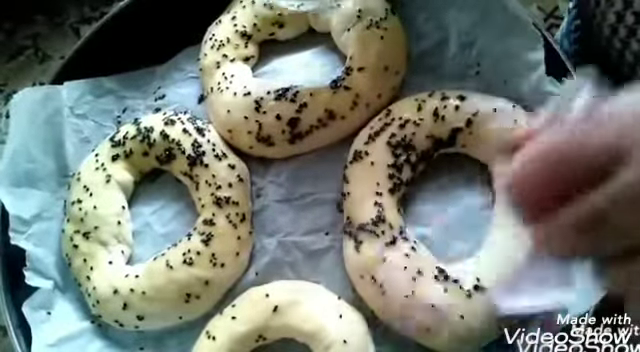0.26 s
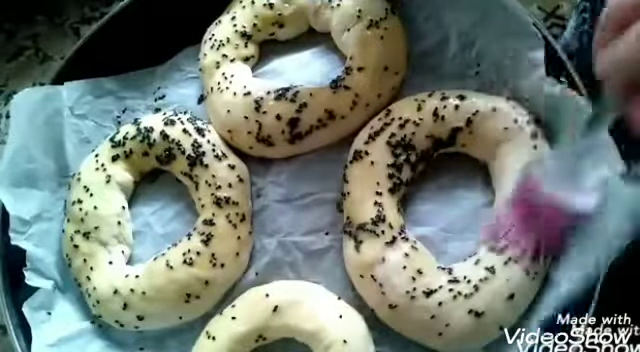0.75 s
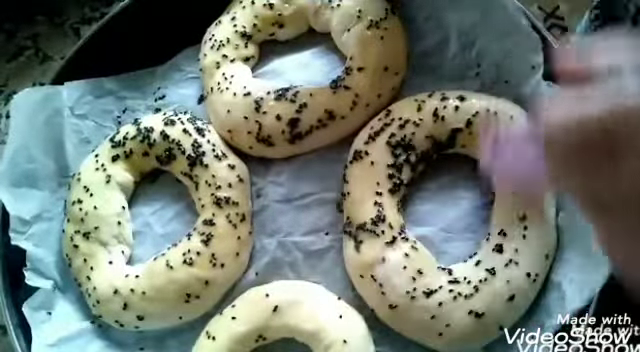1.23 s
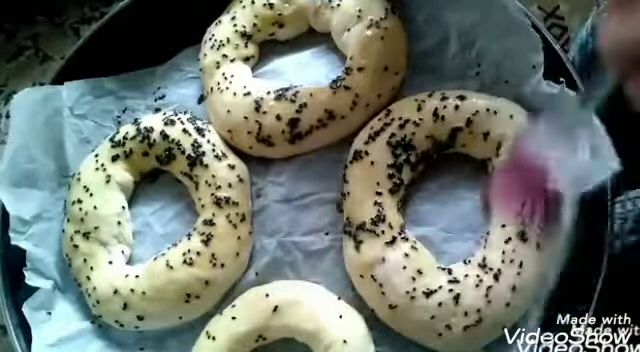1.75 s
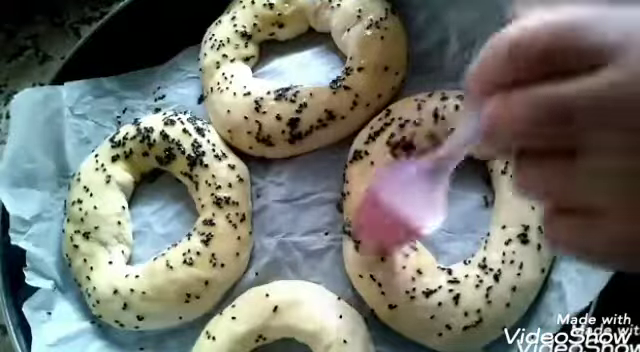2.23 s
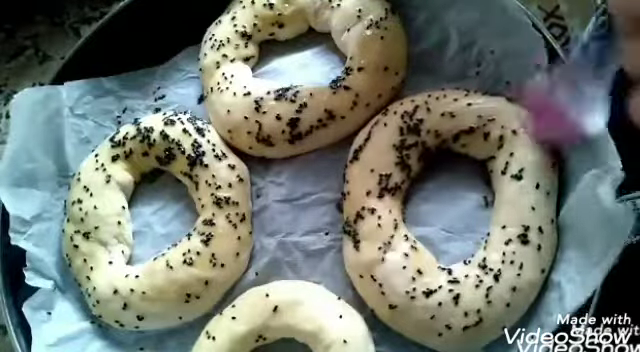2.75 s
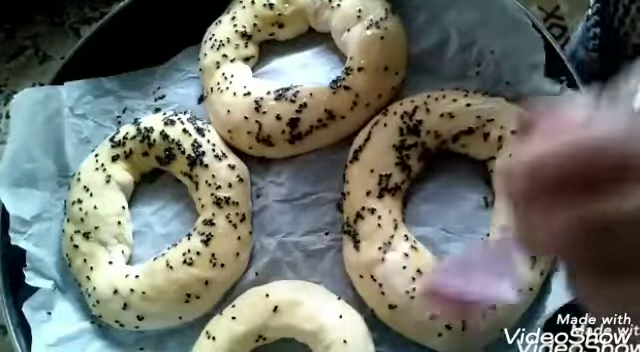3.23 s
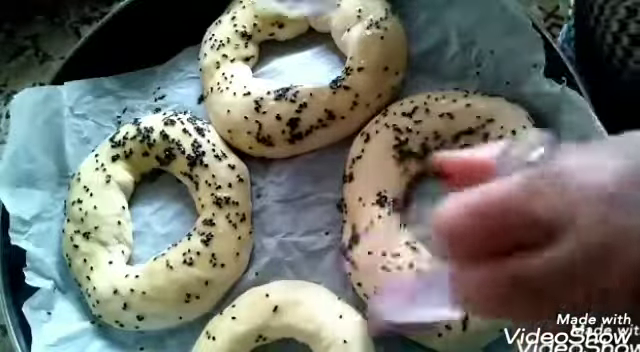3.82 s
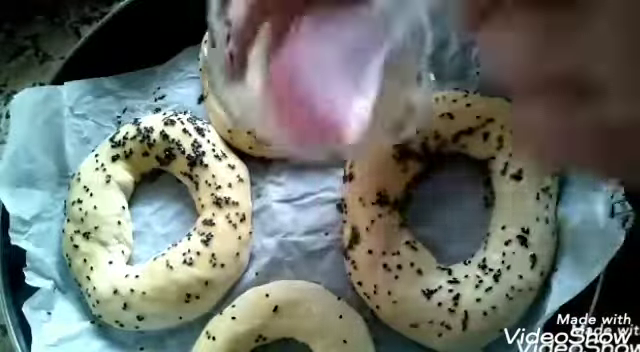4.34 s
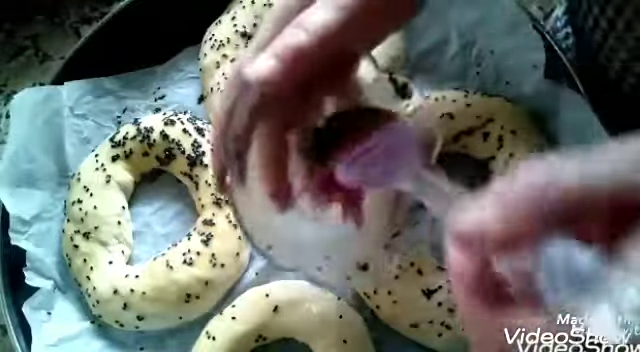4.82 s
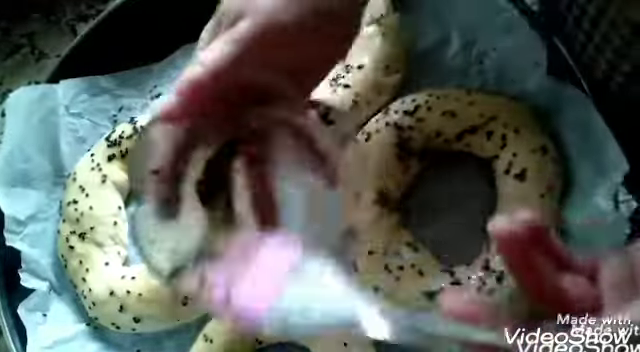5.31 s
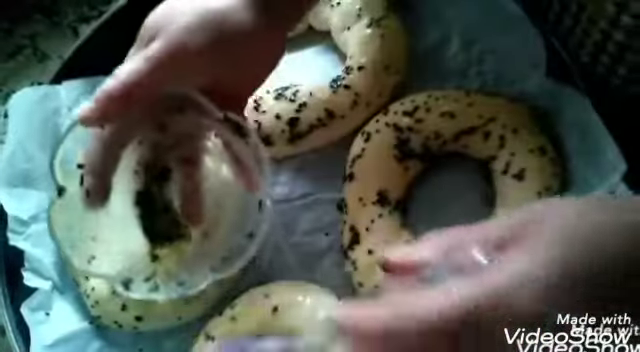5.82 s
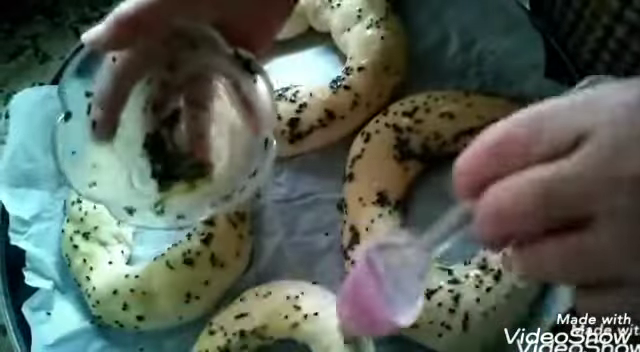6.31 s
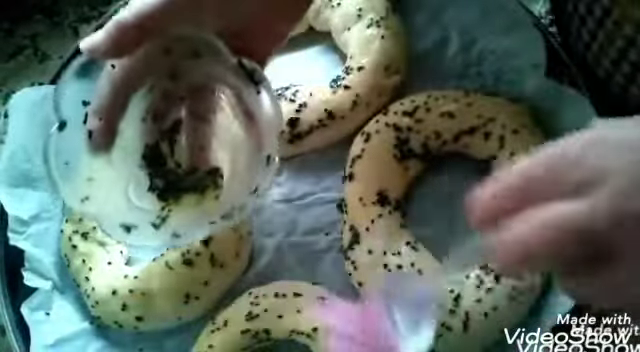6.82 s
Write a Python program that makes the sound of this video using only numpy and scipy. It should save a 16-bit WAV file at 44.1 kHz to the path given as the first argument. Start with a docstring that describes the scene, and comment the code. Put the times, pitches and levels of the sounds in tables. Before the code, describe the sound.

Baking paper crackles in short, crisp bursts as a wet pastry brush swishes across dough and the metal tray knocks softly. After the loudest crinkle, about three seconds in, things turn gentler: brush dabs, hands sliding on a bowl, and another small rustle with a snap. The microphone is close, in a small kitchen with a steady appliance hum and very faint, thin high tones.

```python
"""In a small kitchen, close up, a silicone brush spreads egg wash over dough rings on baking paper.
Friction makes the bristles hiss and the shifting hands and bowl rub. Caught by brush or hand, the
paper buckles: it crinkles and snaps. Bumps excite the damped modes of the metal tray beneath, among
brief squeaks and rasps. An appliance drones behind, and faint, thin high tones flicker in the
background. The two microphone ports resonate at different pitches."""
import sys
import numpy as np
from scipy import signal
from scipy.fft import rfft, irfft, next_fast_len
from scipy.io import wavfile
from scipy.ndimage import uniform_filter1d

SR = 44100
rng = np.random.default_rng(int(sys.argv[2]) if len(sys.argv) > 2 else 0)


def log_audio(samples):
    """Write samples as a 16-bit WAV file to the path given in sys.argv[1]."""
    # one column per channel
    frames = np.atleast_2d(samples).T
    # limit to full scale, then quantise
    limited = np.clip(frames, -1, 1)
    pcm = np.round(limited * 32767).astype(np.int16)
    wavfile.write(sys.argv[1], SR, pcm)


N = 311346
TIME = np.arange(N) / SR
STEPS = TIME[::32]   # coarse clock for the gestures

# Levels are relative; pan is left minus right. A gesture's t is the moment it reaches full force.
# spectrum of the appliance's drone: (f/Hz, level/dB)
DRONE_SPECTRUM = [(25, -29), (45, -21.5), (72, -13), (98, 5.5), (130, -8.5), (185, -6), (240, -17.5),
                  (320, -11), (480, -18.5), (650, -29.5), (950, -37), (1200, -14.5), (1350, -18.5),
                  (1520, -11), (1800, -58), (3500, -60), (5500, -56), (14000, -53.5)]
# brief dips of the drone: (t/s, half width/s, level change/dB)
DRONE_DIPS = [(1.139, 0.035, -20), (1.718, 0.021, -12.5), (2.421, 0.065, -4), (3.584, 0.094, -7.5),
              (4.2, 0.18, -9), (4.85, 0.24, -3.5), (6.29, 0.094, -8), (6.62, 0.14, -7.5)]
# faint, thin, flickering high tones in the background: (f/Hz, level/dB)
HIGH_TONES = [(5330, -90), (10450, -101), (11300, -92.5)]
# the brush sweeps the dough or dips in the bowl: (t/s, rise/s, hold/s, hiss/dB, rub re hiss/dB, pan/dB)
BRUSH_STROKES = [(0.029, 0.013, 0.0061, -58.5, -6, -6.5), (0.132, 0.028, 0.013, -43.5, 0.5, -0.5),
                 (0.234, 0.044, 0.012, -44, 4.5, 1), (0.791, 0.065, 0.029, -43.5, -16, 1.5),
                 (1.5, 0.051, 0.12, -53, 4, -3), (1.751, 0.013, 0.095, -46.5, -7, 2.5),
                 (2.454, 0.02, 0.12, -47.5, -21, -2.5), (2.62, 0.21, 0.13, -54.5, 4.5, 1.5),
                 (3.702, 0.0062, 0.12, -46.5, 1.5, -0.5), (3.909, 0.071, 0.011, -51.5, -30, -0.5),
                 (4.495, 0.0062, 0.0081, -49, 0, 2.5), (4.629, 0.13, 0.0072, -49.5, 7, 2),
                 (4.767, 0.049, 0.014, -50, 2, 1), (4.852, 0.04, 0.013, -54.5, 11, -0.5),
                 (4.992, 0.022, 0.0064, -55, 17.5, -8.5), (5.094, 0.018, 0.011, -51, 6, -0.5),
                 (6.017, 0.031, 0.0054, -60, -26, -7), (6.098, 0.0089, 0.0041, -50.5, -7, 2.5),
                 (6.204, 0.029, 0.014, -62.5, -19, -0.5), (6.817, 0.039, 0.0085, -52, 7.5, -0.5),
                 (6.923, 0.039, 0.012, -55.5, -18, 1.5)]
# spectra of the bristles' hiss, their rub and the yielding dough: (f/Hz, level/dB)
HISS_SPECTRUM = [(3000, -19), (5000, -4.5), (7500, -1.5), (10000, -4), (12000, -7), (14000, -8.5),
                 (15000, -32.5)]
RUB_SPECTRUM = [(400, -25.5), (900, -35.5), (1800, -11), (2400, 6), (3200, 6.5), (4500, 1.5), (6200, -5),
                (8000, -19), (13000, -30)]
PRESS_SPECTRUM = [(50, -15.5), (130, -5.5), (320, 8), (480, -2.5), (700, -3), (1100, -22.5), (2500, -47.5)]
# hands and bowl slide: (t/s, rise/s, hold/s, rub/dB, resonance f/Hz, dull handling/dB)
HAND_SLIDES = [(0.158, 0.043, 0.16, -57.5, 4960, -56.5), (0.604, 0.071, 0.15, -50.5, 2160, -58),
               (2.185, 0.074, 0.12, -62.5, 2320, -65), (2.503, 0.081, 0.12, -54, 5400, -68),
               (4.34, 0.091, 0.06, -56, 2630, -53), (4.487, 0.052, 0.29, -61, 2750, -60),
               (4.993, 0.093, 0.059, -56, 2090, -63), (5.274, 0.051, 0.56, -54, 2500, -55.5),
               (6.108, 0.12, 0.41, -80.5, 2830, -61), (6.771, 0.078, 0.19, -55.5, 1990, -55.5)]
# spectra of the sliding rub and the dull handling: (f/Hz, level/dB)
SLIDE_SPECTRUM = [(900, -31), (1600, -13.5), (2100, -2.5), (3200, 3), (4500, 2), (6200, -1.5),
                  (8000, -21.5), (13000, -24)]
HANDLING_SPECTRUM = [(50, -14.5), (130, -2), (320, 11.5), (480, -3), (750, -1.5), (1000, -15.5),
                     (2500, -47)]
# pushes on the paper: (t/s, rise/s, hold/s, crackle/dB, flex re crackle/dB, drag/dB, pan/dB)
PAPER_PUSHES = [(0.381, 0.015, 0.0059, -41, -3.5, -46.5, -0.5), (0.859, 0.07, 0.098, -38, -7, -49.5, 2.5),
                (1.139, 0.19, 0.058, -39, -5, -64.5, 0.5), (1.287, 0.077, 0.045, -39, -2, -46, -1.5),
                (1.397, 0.018, 0.0065, -37, -18, -51.5, -2.5), (1.563, 0.17, 0.0068, -50.5, -8, -57, -1.5),
                (1.851, 0.043, 0.057, -37.5, -7, -49.5, 3), (1.948, 0.0081, 0.064, -38, -5, -53, -1),
                (2.059, 0.048, 0.032, -45, -1.5, -50, -4.5), (2.121, 0.0048, 0.0098, -47, 7, -50.5, 1),
                (2.81, 0.017, 0.013, -38, -2, -49, 0), (2.902, 0.005, 0.036, -42.5, -6.5, -48, 1),
                (2.975, .008, 0.042, -42, -2, -50, -0.5), (3.029, .008, 0.045, -38.5, -8.5, -47.5, 1),
                (3.073, .006, 0.054, -33, -9, -46, -0.5), (3.136, 0.012, 0.057, -28, -6, -40.5, 0),
                (3.303, 0.023, 0.0058, -46, -3, -53.5, 1), (5.208, 0.035, 0.0059, -48, -7, -61, -0.5),
                (5.371, 0.25, 0.06, -49.5, -11, -54, -1), (5.516, 0.15, 0.1, -56, -7.5, -61, -2),
                (5.713, 0.13, 0.012, -45, -11.5, -50.5, -0.5),
                (5.804, 0.0028, 0.02, -53.5, -10.5, -53.5, 2), (5.897, 0.037, 0.011, -58.5, -6, -53.5, 1.5)]
# spectra of the paper crackling, flexing and dragging on the tray: (f/Hz, level/dB)
CRACKLE_SPECTRUM = [(1800, -7.5), (3000, -19.5), (4000, -6), (6000, 6), (8000, 5), (10000, 1.5),
                    (12000, 0.5), (13800, -6), (15000, -30.5)]
FLEX_SPECTRUM = [(500, -38.5), (900, -5.5), (1500, 1), (2300, 5.5), (3100, 3), (4200, 1), (7000, -26.5)]
DRAG_SPECTRUM = [(40, -27), (90, -7), (170, -7), (250, -4), (330, 0), (480, 0), (700, -6.5), (1100, -3),
                 (2500, -42.5)]
# brief squeaks and rasps and, last, a faint swell near 1.5 kHz in the background drone:
# (t/s, length/s, start f/Hz, end f/Hz, level/dB, roughness)
BRIEF_TONES = [(0.376, 0.033, 6150, 6270, -42.5, 0.77), (0.56, 0.069, 695, 707, -49.5, 0.29),
               (0.607, 0.24, 734, 660, -62, 0.92), (1.159, 0.047, 430, 506, -52.5, 0.3),
               (4.125, 0.094, 732, 795, -71, 0.95),  (4.192, 0.11, 3670, 4160, -73, 0.67),
               (4.217, 0.3, 5630, 5980, -78, 1.2), (5.682, 0.27, 690, 688, -63.5, 1.1),
               (5.895, 0.18, 1120, 1070, -66.5, 1), (6.369, 0.25, 1494, 1562, -67.5, 0.9)]
# soft bumps on the tray: (t/s, level/dB, hardness as tilt of the modes/(dB per octave))
TRAY_BUMPS = [(0.382, -58, 12), (0.863, -44.5, 1.5), (0.882, -43.5, 0.5), (0.913, -45, 6),
              (1.282, -36.5, 2.5), (1.324, -51.5, -8.5), (1.894, -46.5, 7), (1.962, -49, -4),
              (2.834, -40, -8), (2.849, -39.5, 0.5), (2.973, -38, -0.5), (3.032, -36.5, -1.5),
              (3.178, -42.5, 12.5), (3.221, -48.5, -3.5), (3.913, -53, -6), (5.258, -48.5, 2),
              (5.56, -45.5, 6), (5.799, -53, 3), (6.778, -56, -10.5)]
# modes of the loaded tray: (f/Hz, level/dB, T60/s)
TRAY_MODES = [(98, 2.5, 0.44), (163, 3, 0.1), (254, -5, 0.044), (323.4, 4, 0.28), (462, 5.5, 0.073)]
# spectrum of dough and paper giving way under a bump: (f/Hz, level/dB)
THUD_SPECTRUM = [(50, -15), (110, 0), (220, -0.5), (330, 3), (520, -0.5), (800, -15.5), (2000, -34.5)]
# creases snapping over: (t/s, level/dB, pan/dB, decay/s, rebound/dB, brightness/(dB per octave))
CREASE_SNAPS = [(0.3857, -8, 7, 0.0013, -3.5, 2.5), (0.8516, -19.5, 3.5, 0.0023, -6, -1),
                (0.8625, -11, -6.5, .002, -3, -2), (0.8843, -3.5, 10, .0006, -10, 2.5),
                (0.9386, -9, 1.5, .002, -22, -2), (0.9543, -20.5, 18, 0.00087, -4, -4),
                (1.1701, -12.5, -2.5, .002, -2.5, -1), (1.1735, -9.5, -4.5, 0.0026, -0.5, -5),
                (1.2028, -19.5, -2.5, 0.0018, -2, 3.5), (1.252, -13, -15, 0.0015, 4, 0.5),
                (1.2627, -14.5, -1.5, 0.0021, -14, 3.5), (1.2911, -1.5, -10.5, .001, 4.5, -4.5),
                (1.293, -5.5, -7, 0.00083, -15.5, 0.5), (1.3005, -20, 13, 0.00081, -6, 1.5),
                (1.3405, -16.5, 14, 0.0012, -12, -7), (1.4477, -18, 6, 0.0017, -4, 2),
                (1.5, -25.5, -1, 0.00085, 4, -4), (1.557, -17, 0, 0.0032, 3, 0.5),
                (1.655, -26.5, -6, 0.00068, -5, 1), (1.849, -11.5, -7, 0.00094, -15, -1.5),
                (1.8523, -9.5, 14, 0.00064, -16, -0.5), (1.887, -12.5, 6, 0.0015, -10, 2),
                (1.9, -25, -2, .0008, -12, 3), (1.9442, -16, 4, 0.00078, -9, -4),
                (1.9512, -21, 8, .001, -10, -7), (2.004, -19.5, -4, 0.0032, -4, -11.5),
                (2.057, -22, 7, 0.0013, 2.5, 7), (2.0728, -13.5, -4, 0.0015, -6, 4),
                (2.097, -20.5, 5, .002, -14, -6), (2.122, -13.5, -1, 0.0017, -5, -4),
                (2.2182, -25, 6, .0008, -4, -5.5), (2.813, -16, 12.5, 0.0015, -6.5, 0),
                (2.8293, -22.5, -2, .002, 0, -1), (2.908, -19.5, -10, 0.0014, -9.5, 2.5),
                (2.9737, -25.5, 8.5, .001, -11.5, -4.5), (2.993, -24, 3.5, .001, -9.5, -1.5),
                (3.016, -10.5, -15.5, 0.00086, -3, 0.5), (3.0669, -8.5, -10, 0.0017, -5.5, 0.5),
                (3.1337, -5, -12.5, .0006, -14, 4), (3.1362, -7.5, -9, .0014, -8.5, 2.5),
                (3.168, -14.5, -0.5, .0012, -5.5, -5.5), (3.2308, -16, 18, .001, -9, 1),
                (3.701, -17.5, -11.5, 0.00089, -12, 0.5), (4.6425, -30, 20, 0.0018, 3, 8),
                (4.7642, -35, -28, 0.0015, -14, 4.5), (5.2758, -27, 44, 0.00084, -21, 4.5),
                (5.4603,  -29, 8.5, 0.002, -12, -7), (5.4924, -11.5, 2, 0.0017, -10, 1.5),
                (5.5146, -23.5, -3, .001, -12, -4), (5.7998, -20.5, -5, .0011, -21, -4)]
# spectrum of a snapping crease: (f/Hz, level/dB)
SNAP_SPECTRUM = [(200, -27), (900, -14.5), (1600, 1.5), (3000, 6), (4500, 1.5), (6500, 1.5), (10000, -2.5),
                 (12000, -4.5), (14500, -9.5)]
# microphone ports, left and right: (resonance f/Hz, Q)
MIC_PORTS = [(5950, 6.3), (10150, 6.4)]


def from_db(db):
    """Amplitude ratio of a level in decibels."""
    return 10 ** (np.asarray(db) / 20)


def rms_one(x):
    """Normalisation to unit mean power."""
    return x / np.sqrt(np.mean(x ** 2) + 1e-20)


def colour(x, spectrum, size=8192):
    """Minimum-phase filtering to a given spectrum; the power of white noise is conserved."""
    hz, db = np.transpose(spectrum)
    grid = np.maximum(np.arange(size // 2 + 1) * SR / size, 1)
    magnitude = from_db(np.interp(np.log(grid), np.log(hz), db))
    cepstrum = irfft(np.log(magnitude))
    cepstrum[1:size // 2] *= 2   # folding the cepstrum makes the filter causal
    cepstrum[size // 2 + 1:] = 0
    response = irfft(np.exp(rfft(cepstrum)))[:size // 2]
    return signal.oaconvolve(x, response[None] / np.linalg.norm(response), axes=1)[:, :N]


def stereo_noise(correlation):
    """Partial coherence: white noise whose two sides have the given correlation."""
    mid, side = rng.standard_normal((2, N))
    return (np.sqrt(1 + correlation) * mid + np.sqrt(1 - correlation) * side * [[1], [-1]]) / np.sqrt(2)


def grains(per_s, spread_db, decay_s, smooth_share):
    """Shot-noise envelope: random slips of uneven size decay over a smooth share of friction."""
    sizes = from_db(spread_db * np.minimum(rng.exponential(1, N), 3.5))
    slips = (rng.random(N) < per_s / SR) * sizes ** 2
    power = signal.lfilter([1], [1, -np.exp(-2 / (decay_s * SR))], slips + 1e-18)
    return np.sqrt(smooth_share + (1 - smooth_share) * power / power.mean())


def patchy(x, spread_db, width_hz, hold_s, size=512):
    """Random modulation: patches of the spectrum swell and fade, with unit mean power gain."""
    spectra = signal.stft(x, nperseg=size)[2]
    field = rng.standard_normal(spectra.shape) + rng.standard_normal(spectra.shape[1:])
    for axis, span in ((1, width_hz * size / SR), (2, 2 * hold_s * SR / size)):
        field = signal.filtfilt([1], [1, -np.exp(-2 / span)], field, axis=axis, padtype=None)
    gain = rms_one(from_db(spread_db * np.clip(field / field.std(), -2, 2)))
    return signal.istft(spectra * gain, nperseg=size)[1][:, :N]


def gestures(table, fall_db_per_s, rise_db=19, rise_curve=1.13):
    """One envelope per movement: growth, hold and exponential decay."""
    full_s, rise_s, hold_s = np.transpose(table)[:3, :, None]
    early = np.maximum(full_s - STEPS, 0) / rise_s
    late = np.maximum(STEPS - full_s - hold_s, 0)
    return from_db(-np.minimum(rise_db * early ** rise_curve + fall_db_per_s * late, 200))


def power_sum(envelopes, db, pan_db=0):
    """Incoherent addition: overlapping gestures add in power to a left and a right gain."""
    lean_db = np.array([[.5], [-.5]]) * pan_db
    gains = np.sqrt(from_db(db + lean_db) ** 2 @ np.square(envelopes))
    return np.array([np.interp(TIME, STEPS, gain) for gain in gains])


def appliance_drone(level_db=-57, coherent_below_hz=300):
    """A diffuse field is coherent only at long wavelengths: both sides share the bass of the drone."""
    bass = signal.butter(1, coherent_below_hz, fs=SR, output="sos")
    diffuse = patchy(stereo_noise(0.22), spread_db=5, width_hz=100, hold_s=.04, size=1024)
    air = diffuse + signal.sosfilt(bass, stereo_noise(1.0) - diffuse)
    dip_db = sum(db * np.exp(-((TIME - s) / width_s) ** 2) for s, width_s, db in DRONE_DIPS)
    return from_db(level_db + dip_db) * rms_one(colour(air, DRONE_SPECTRUM))


def high_tones(width_hz=60):
    """Narrow-band noise is heard as pitch: faint, thin high tones flicker in the background."""
    out = 0
    for hz, db in HIGH_TONES:
        peak = signal.iirpeak(hz, hz / width_hz, fs=SR)
        band = signal.lfilter(*peak, rng.standard_normal((2, N)))
        out = out + from_db(db) * rms_one(signal.lfilter(*peak, band))
    return patchy(out, spread_db=6, width_hz=200, hold_s=.08)


def brush():
    """Friction noise: wet bristles hiss and tick over a duller rub and the soft give of the dough."""
    db, rub_db, pan_db = np.transpose(BRUSH_STROKES)[3:]
    contacts = gestures(BRUSH_STROKES, fall_db_per_s=182)   # the bristles lift off
    wet_trails = from_db(-18.5) * gestures(BRUSH_STROKES, fall_db_per_s=80)
    strokes = np.maximum(contacts, wet_trails)
    flicks = grains(per_s=1200, spread_db=1.5, decay_s=.0006, smooth_share=.85)
    hiss = colour(stereo_noise(0.053) * flicks * power_sum(strokes, db, pan_db), HISS_SPECTRUM)
    rub = colour(stereo_noise(0.082) * flicks * power_sum(contacts, db + rub_db, pan_db), RUB_SPECTRUM)
    press = colour(stereo_noise(0.11) * power_sum(strokes, db - 13.5), PRESS_SPECTRUM)
    mix = from_db(-11) * hiss + from_db(-18) * rub + from_db([[-1.5], [-4.5]]) * press
    return patchy(mix, spread_db=5.5, width_hz=100, hold_s=.03)


def hands(resonance_q=4.5, resonance_db=11.5):
    """Sliding friction of hands and bowl excites a new resonance at each grip, over dull stick-slip."""
    rub_db, resonance_hz, dull_db = np.transpose(HAND_SLIDES)[3:]
    slides = gestures(HAND_SLIDES, fall_db_per_s=146.5)
    friction, rub = stereo_noise(0.08), 0
    for slide, db, hz in zip(slides, rub_db, resonance_hz):
        contact = friction * np.interp(TIME, STEPS, from_db(db) * slide)
        ring = signal.lfilter(*signal.iirpeak(hz, resonance_q, fs=SR), contact)
        rub = rub + contact + from_db(resonance_db) * ring
    slips = grains(per_s=55, spread_db=1.1, decay_s=.02, smooth_share=.15)
    dull = colour(stereo_noise(0.098) * slips * power_sum(slides, dull_db), HANDLING_SPECTRUM)
    mix = from_db(-14) * colour(rub, SLIDE_SPECTRUM) + from_db([[-1.5], [-4.5]]) * dull
    return patchy(mix, spread_db=8, width_hz=50, hold_s=.062)


def paper_crinkle():
    """Buckling: small buckles crackle and also flex the sheet, which drags on the tray."""
    db, flex_db, drag_db, pan_db = np.transpose(PAPER_PUSHES)[3:]
    spring_back = gestures(PAPER_PUSHES, fall_db_per_s=326.5)
    settling = from_db(-18.5) * gestures(PAPER_PUSHES, fall_db_per_s=129)
    pushes = np.maximum(spring_back, settling)
    buckles = grains(per_s=520, spread_db=2.2, decay_s=.0011, smooth_share=.07)
    crackle = colour(stereo_noise(0.19) * buckles * power_sum(pushes, db, pan_db), CRACKLE_SPECTRUM)
    flex = colour(stereo_noise(0.12) * buckles * power_sum(pushes, db + flex_db, pan_db), FLEX_SPECTRUM)
    drag = colour(stereo_noise(0.25) * buckles * power_sum(pushes, drag_db), DRAG_SPECTRUM)
    mix = from_db(-7.5) * crackle + from_db(2.5) * flex + from_db([[.5], [-1.5]]) * drag
    folds = patchy(mix, spread_db=3, width_hz=900, hold_s=.02)   # every fold has its own colour
    return patchy(folds, spread_db=5, width_hz=100, hold_s=.016)


def squeaks_and_swell(relative_width=.12):
    """Random modulation broadens a tone: brief squeaks and rasps, and a faint swell in the drone."""
    out = np.zeros(N)
    for s, length_s, start_hz, end_hz, db, roughness in BRIEF_TONES:
        at, count = round(s * SR), round(length_s * SR)
        cycles = np.cumsum(np.linspace(start_hz, end_hz, count)) / SR
        noise = rng.standard_normal((2, 512))
        rasp = np.interp(cycles * relative_width, np.arange(512), noise[0] + 1j * noise[1])
        roughness = min(roughness, 1)
        amplitude = np.sqrt(1 - roughness) + np.sqrt(roughness) * rasp
        tone = np.real(amplitude * np.exp(2j * np.pi * cycles))
        out[at:at + count] += from_db(db) * signal.windows.tukey(count, .4) * rms_one(tone)
    return out


def tray_ring(gain_db=-11, spread_db=2.5, detune=.05, lowest_hz=75):
    """Modal vibration: bumps ring the tray; the dough's load shifts each mode's pitch and level."""
    t = TIME[:SR // 4]
    out = np.zeros(N + len(t))
    hz, mode_db, t60 = np.array(TRAY_MODES).T[:, :, None]
    signs = (-1) ** np.arange(len(TRAY_MODES))
    octaves = np.log2(hz) - np.log2(hz).mean()
    for s, db, hardness in TRAY_BUMPS:
        strength, shift = rng.standard_normal((2, len(TRAY_MODES), 1))
        rings = np.exp(-np.log(1000) * t / t60) * np.sin(2 * np.pi * hz * (1 + detune * shift) * t)
        gains = from_db(db + gain_db + mode_db + hardness * octaves + spread_db * strength)
        at = round(s * SR)
        out[at:at + len(t)] += signs @ (gains * rings)
    low_cut = signal.butter(2, lowest_hz, "high", fs=SR, output="sos")
    return signal.sosfilt(low_cut, out[:N]) * from_db([[-.5], [.5]])


def dough_thuds(gain_db=-4, rise_s=.002, decay_s=.0071):
    """Cushioned impact: the dough gives way under each bump with a broad, dull thud."""
    out, t = np.zeros((2, N)), TIME[:SR // 8]
    envelope = np.exp(-t / decay_s) * (1 - np.exp(-t / rise_s))
    for s, db, _ in TRAY_BUMPS:
        noise = rng.standard_normal((3, len(t)))   # common, left, right
        thud = envelope * (noise[0] + .5 * noise[1:])
        at = round(s * SR)
        out[:, at:at + len(t)] += from_db(db + gain_db) * thud * from_db([[1], [-1]])
    return colour(out, THUD_SPECTRUM)


def paper_snaps(rise_s=.0004, flutter_db=-20, flutter_s=.012, ring_db=-24, ring_s=.00081,
                pivot_hz=5000, pan_share=.43, size=2048):
    """Snap-through: a crease flips and rebounds; the fold rings and the sheet flutters briefly."""
    out, t = np.zeros((2, N + size)), TIME[:size]
    octaves = np.log2(np.maximum(np.arange(size // 2 + 1) * SR / size, 700) / pivot_hz)
    flutter = from_db(flutter_db) * np.exp(-t / flutter_s)
    noises = rng.standard_normal((len(CREASE_SNAPS), 2, size))
    for (s, db, pan_db, decay_s, rebound_db, brightness), noise in zip(CREASE_SNAPS, noises):
        lag_s, fold_hz = rng.uniform(.0028, .0039), rng.uniform(2550, 4930)
        flip = np.exp(-t / decay_s) * (1 - np.exp(-t / rise_s))
        flip /= flip.max()
        rebound = from_db(rebound_db) * np.interp(t - lag_s, t, flip)
        spectrum = rfft(noise * (flip + rebound + flutter))
        spectrum /= np.sqrt(uniform_filter1d(np.abs(spectrum) ** 2, size=160))   # flat, ragged in detail
        crack = irfft(spectrum * from_db(brightness * octaves))
        fold = from_db(ring_db) * np.exp(-t / ring_s) * np.sin(2 * np.pi * fold_hz * t + noise[:, -1:])
        gains = from_db(db + pan_share * pan_db * np.array([[.5], [-.5]]))
        at = round(s * SR)
        out[:, at:at + size] += (crack + fold) * (1 - t / t[-1]) * gains
    return colour(out[:, :N], SNAP_SPECTRUM)


def kitchen(x, t60=.22, wet_db=-4.5, build_s=.0013, lowest_hz=350):
    """Reverberation: dense reflections from table and walls decay exponentially; the bass stays direct."""
    t = TIME[:SR // 2]
    envelope = np.exp(-np.log(1000) * t / t60) * (1 - np.exp(-t / build_s))
    low_cut = signal.butter(1, lowest_hz, "high", fs=SR, output="sos")
    tail = signal.sosfilt(low_cut, rng.standard_normal((2, len(t))) * envelope)
    tail /= np.linalg.norm(tail, axis=1, keepdims=True)
    return x + from_db(wet_db) * signal.oaconvolve(x, tail, axes=1)[:, :N]


def scene():
    """Superposition: the brief sounds and their reflections add to the drone and the high tones."""
    work = paper_crinkle() + paper_snaps() + brush() + hands() + tray_ring() + dough_thuds()
    return kitchen(work + squeaks_and_swell()) + appliance_drone() + high_tones()


def record(dry):
    """Port resonance: each side is a second-order low-pass, followed by a steep cut above 15 kHz."""
    size = next_fast_len(N + SR // 2) // 2 * 2
    f = np.arange(size // 2 + 1) * SR / size
    ports = np.array([1 / (1 - (f / hz) ** 2 + 1j * f / (hz * q)) for hz, q in MIC_PORTS])
    heard = irfft(rfft(dry, size) * ports, size)[:, :N] * from_db([[.4], [-.4]])   # left a little louder
    return signal.sosfilt(signal.ellip(10, .2, 70, 15000, fs=SR, output="sos"), heard)


dry = scene()
out = record(dry)
log_audio(out)
```